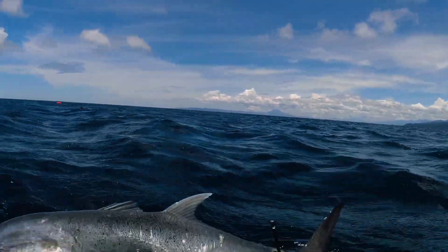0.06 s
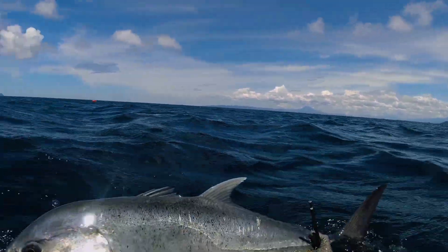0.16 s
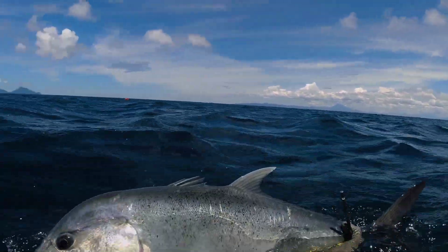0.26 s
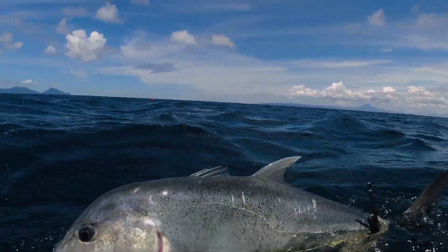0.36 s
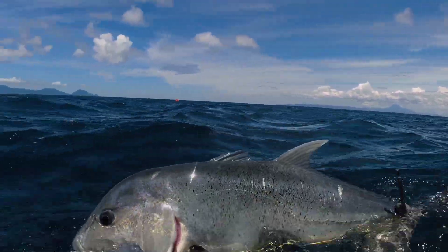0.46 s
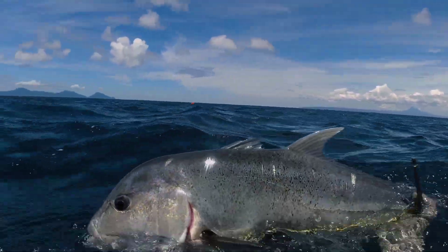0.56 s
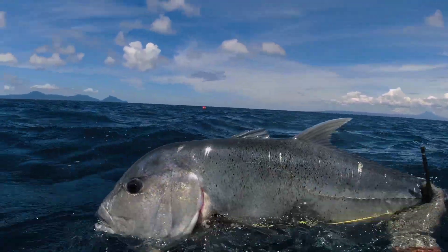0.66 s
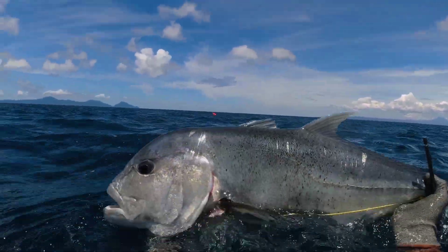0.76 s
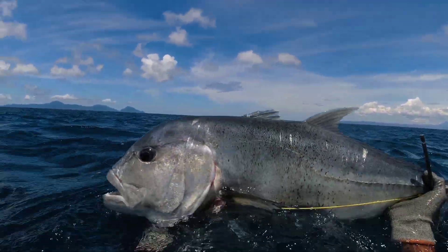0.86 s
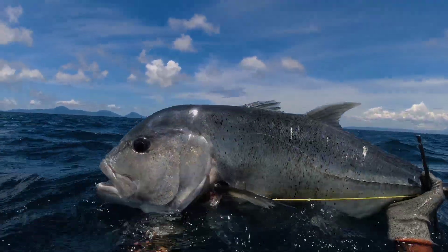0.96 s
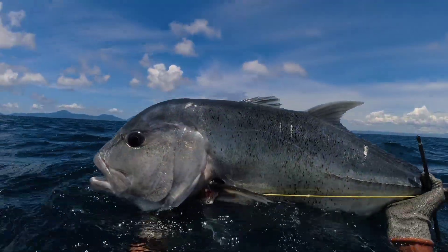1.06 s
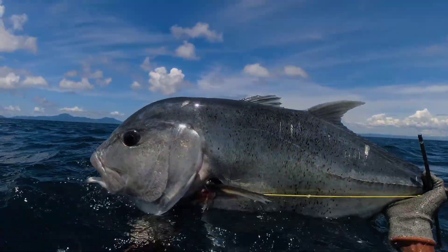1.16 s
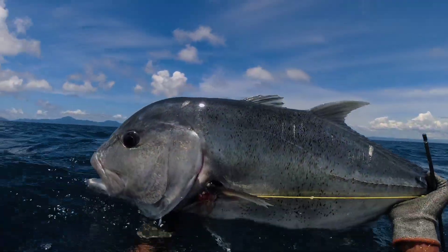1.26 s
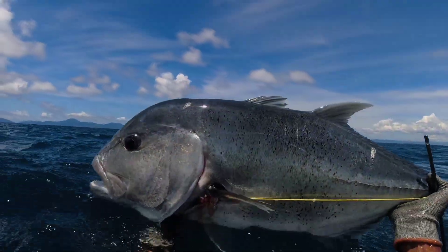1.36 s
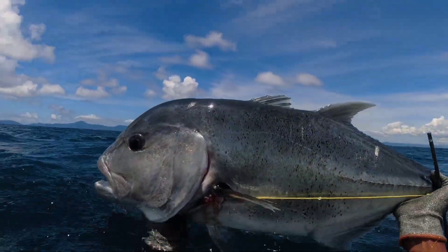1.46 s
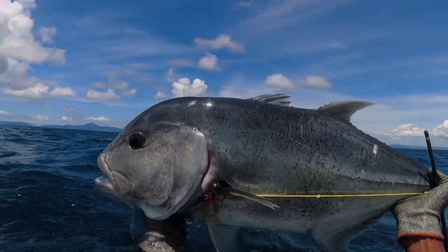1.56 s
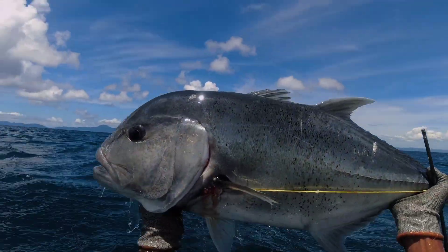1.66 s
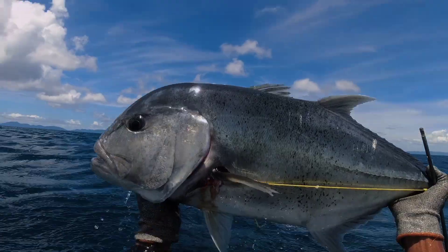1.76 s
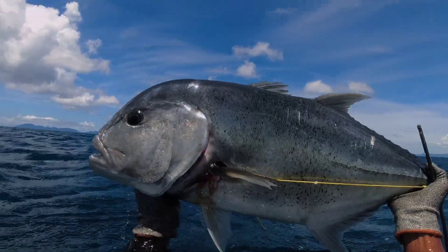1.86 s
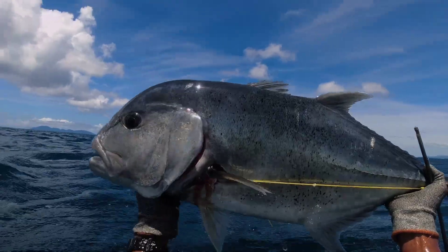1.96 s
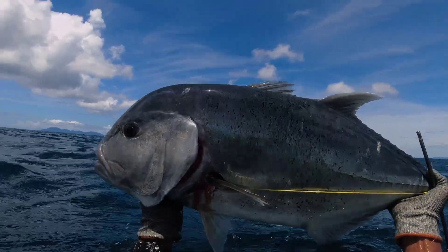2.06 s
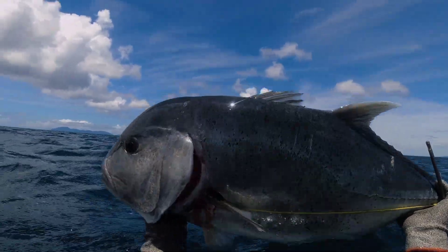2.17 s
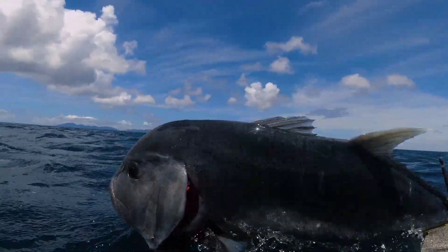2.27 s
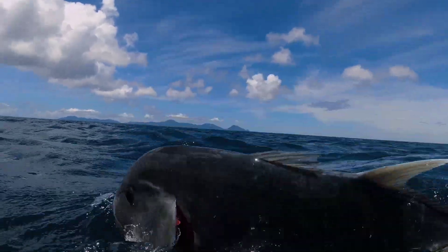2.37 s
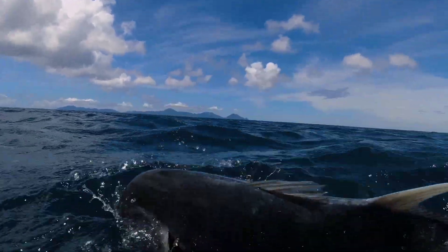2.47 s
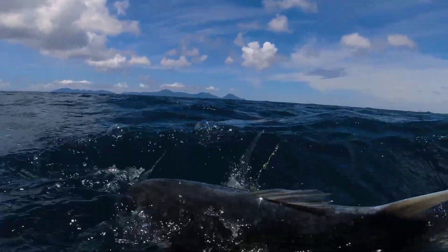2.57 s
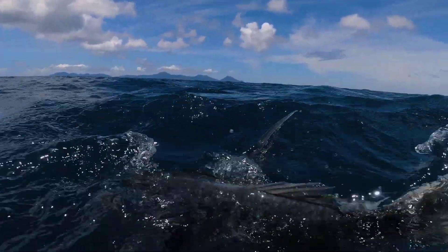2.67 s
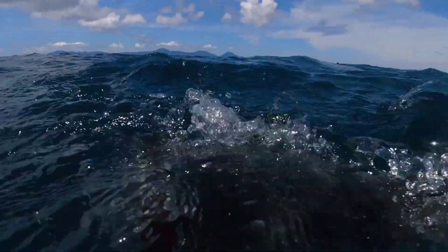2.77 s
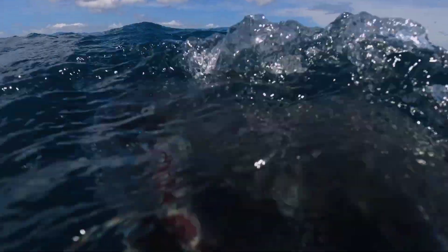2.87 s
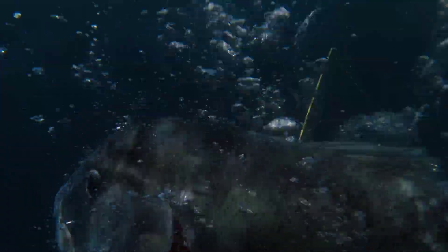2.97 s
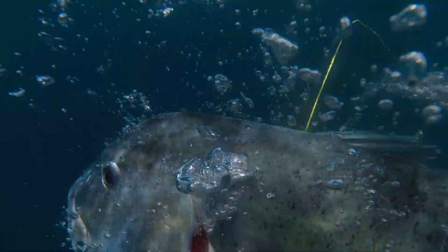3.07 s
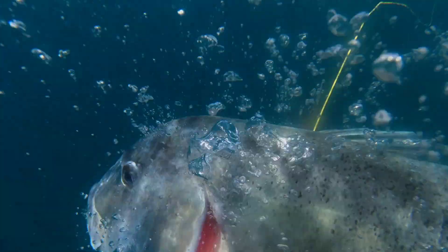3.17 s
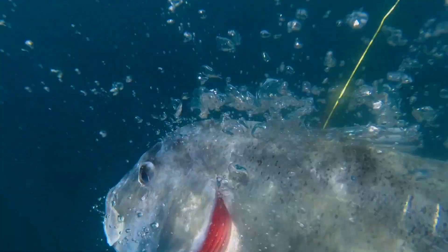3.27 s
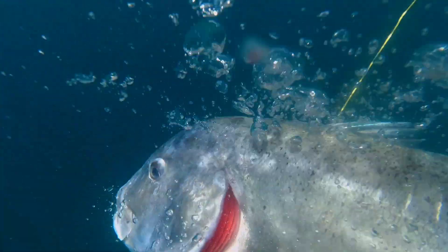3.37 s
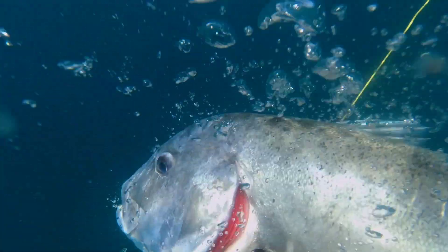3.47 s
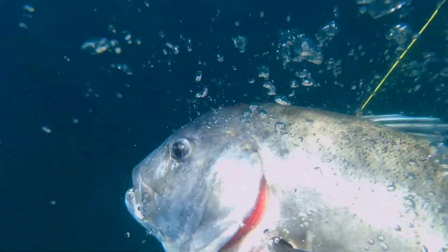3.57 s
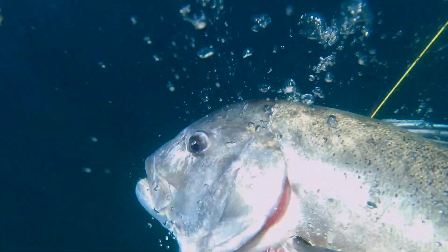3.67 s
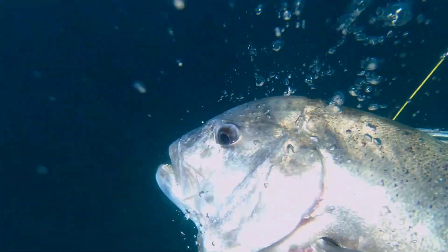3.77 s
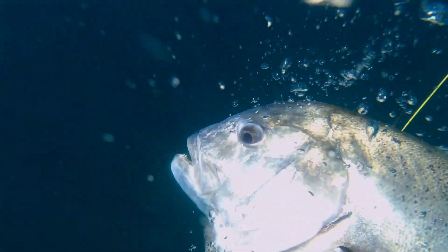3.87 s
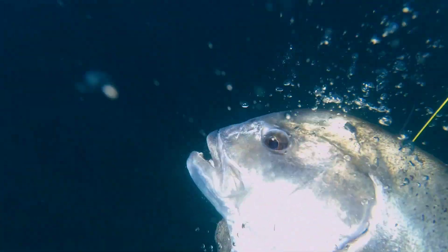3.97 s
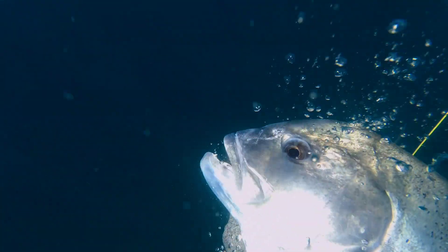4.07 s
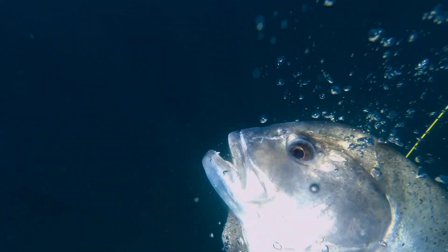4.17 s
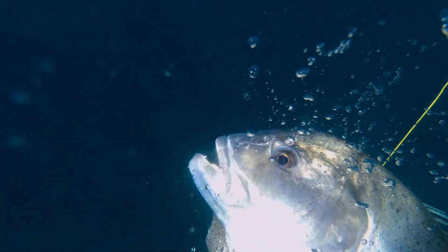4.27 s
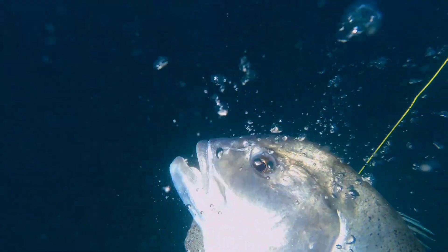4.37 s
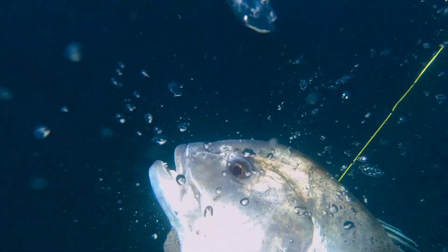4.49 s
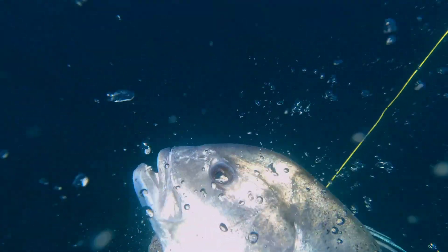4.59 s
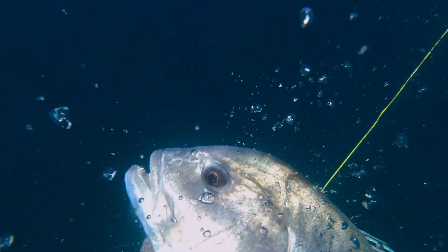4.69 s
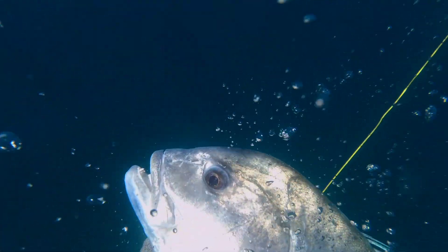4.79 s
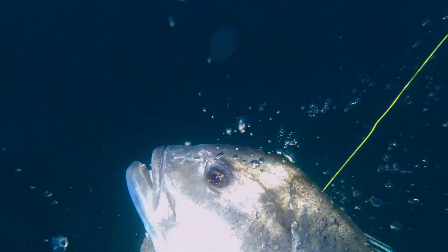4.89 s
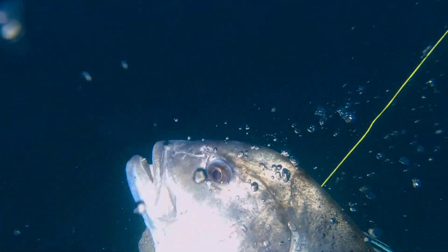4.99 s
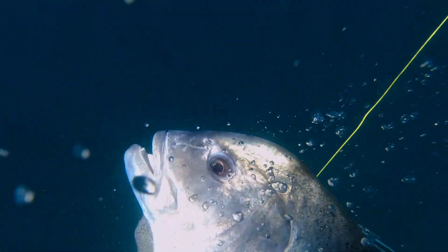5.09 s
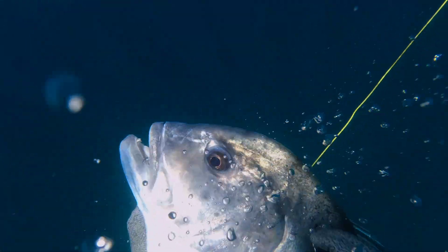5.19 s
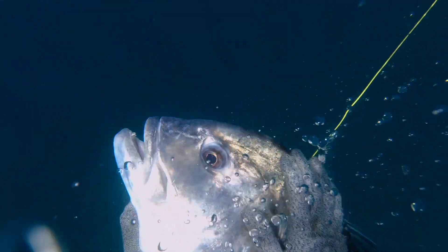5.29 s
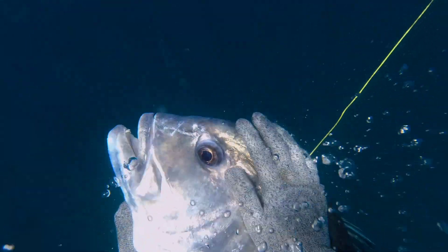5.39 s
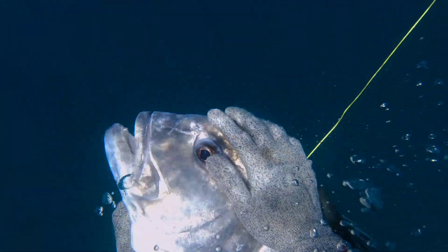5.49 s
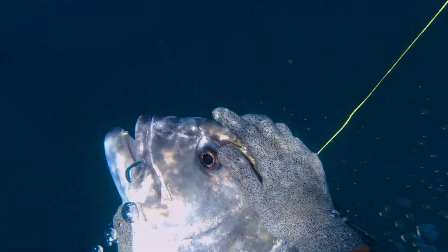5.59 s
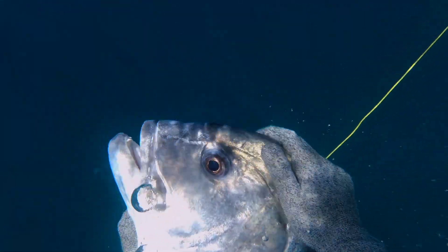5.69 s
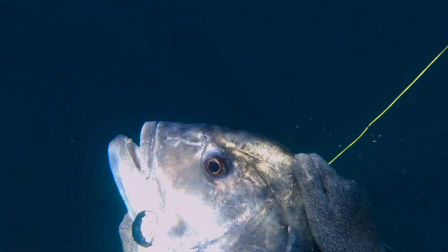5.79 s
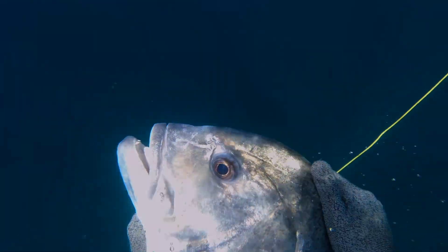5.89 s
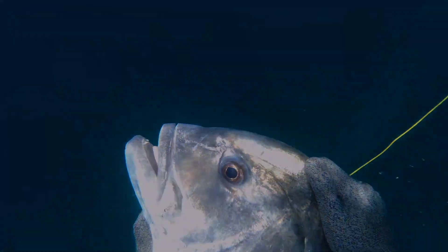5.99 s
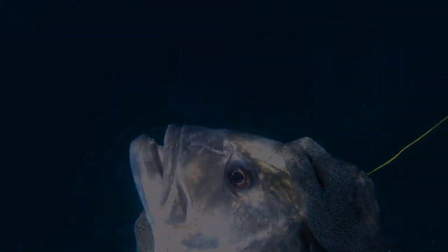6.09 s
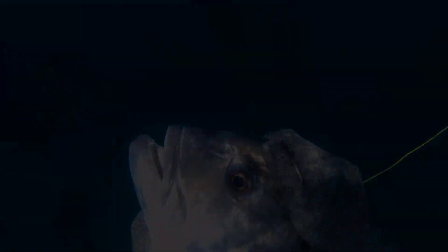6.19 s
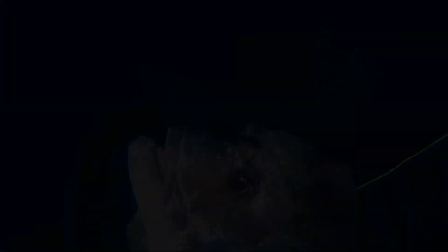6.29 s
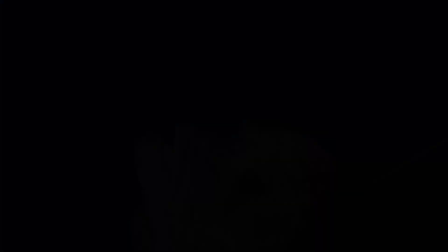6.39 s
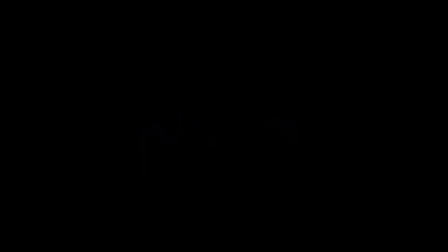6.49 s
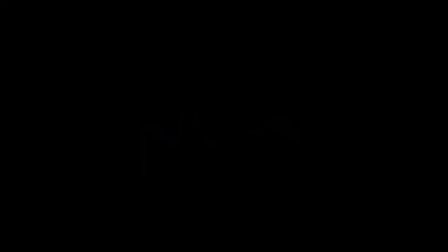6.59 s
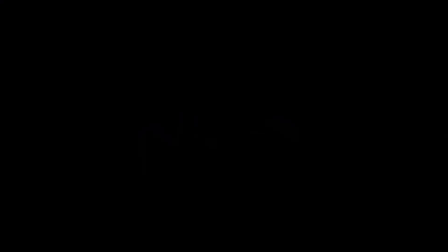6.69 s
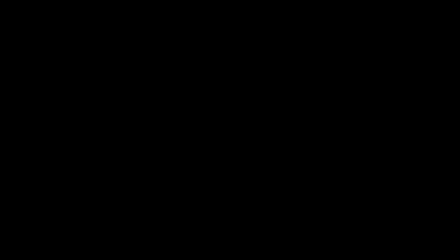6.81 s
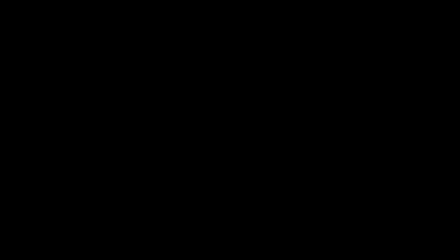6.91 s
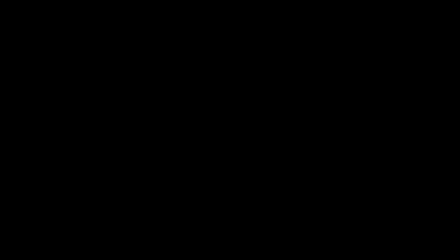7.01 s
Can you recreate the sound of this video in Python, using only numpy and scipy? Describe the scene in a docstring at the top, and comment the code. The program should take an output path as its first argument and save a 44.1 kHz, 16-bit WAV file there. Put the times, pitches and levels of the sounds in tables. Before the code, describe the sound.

Quiet wavelets and drips tick on a waterproof housing, then a loud crackling plunge overloads and gives way to muffled bubbling, gurgles and soft rubbing.

```python
"""Plunge under the sea

A camera in a waterproof housing lies among lapping wavelets and drips, then dips under water.
Drops, bubbles and wavelets are crowds of short ringing tones and noise, shaped by spectra.
The plunge is a dense crackle with popping bubbles; its loudest sounds overload the input.
Below, bubbles ring and gurgle through the housing's resonance, tiny ones tick, and a glove rubs on it.
"""
import sys
import numpy as np
from scipy.fft import rfft, irfft, next_fast_len
from scipy.io import wavfile
from scipy.ndimage import map_coordinates

SR = 44100
rng = np.random.default_rng(int(sys.argv[2]) if len(sys.argv) > 2 else 0)


def bounce(signal):
    """Save signal as a 16-bit WAV file at the path given by the first command-line argument."""
    frames = np.transpose(np.atleast_2d(signal))
    limited = np.clip(frames, -1, 1)
    pcm = np.round(limited * 32767).astype(np.int16)
    wavfile.write(sys.argv[1], SR, pcm)


N = 310902  # length in samples
END_S, TOP_HZ = 6.585, 15900  # the sound has faded out by END_S; nothing is heard above TOP_HZ

# In these tables, "decay" is the time to fall by 60 dB.
# How hard the wavelets lap, before each layer's own setting. Each row: time in seconds, level in dB.
LAPPING = [(0.0, -67), (0.4, -65.5), (0.56, -60.5), (0.75, -60), (0.95, -68.5), (2.25, -77.5),
           (2.34, -68.5), (2.49, -41.5), (2.545, -42), (2.61, -57), (2.72, -48.5), (2.76, -42.5),
           (2.88, -45), (2.97, -42)]
# Spectrum of the wavelets, peaking at the modes of the half-dry housing.
# Each row: frequency in Hz, relative level in dB per Hz.
SLOSH = [(200, -16.5), (420, -12.5), (590, -6), (740, -10.5), (920, 1.5), (1080, -9), (1450, -5.5),
         (1780, -22.5), (3000, -49)]
# Spectrum of their spray. Each row: frequency in Hz, relative level in dB per Hz.
SPRAY = [(900, -28.5), (1600, -11), (2200, 7), (3000, 1), (4000, -4.5), (5000, -10), (6500, -22.5),
         (7500, -28), (10500, -31.5), (15500, -48)]
# Slow water pressure on the ports, before heave_db. Each row: time in seconds, level in dB.
HEAVE_LEVEL = [(0.0, -58), (1.16, -56.5), (1.6, -59.5), (1.67, -29), (1.76, -60), (1.87, -52),
               (1.94, -24.5), (2.07, -21), (2.25, -56), (2.51, -51.5), (2.78, -28.5), (3.14, -32),
               (3.17, -22.5), (3.24, -54.5), (3.51, -37), (5.11, -56.5), (5.56, -40.5), (5.92, -61.5),
               (6.33, -40), (6.4, -40)]
# Spectrum of the slow pressure. Each row: frequency in Hz, relative level in dB per Hz.
HEAVE = [(3, -9.5), (8, 17.5), (13, 6.5), (20, 2), (35, -12), (60, -25), (130, -48.5), (600, -100)]
# Spectrum of the low hum. Each row: frequency in Hz, relative level in dB per Hz.
RUMBLE = [(20, -9.5), (55, 2.5), (90, 1), (125, -1.5), (160, -4.5), (220, -11), (290, -6.5), (420, -21.5),
          (900, -40.5), (3000, -72), (8000, -100)]
# The faint hiss, before its slow random drift. Each row: time in seconds, level in dB.
HISS = [(.5, -84), (2, -84.5), (4, -90.5), (4.6, -80.5), (5, -81), (6.1, -81)]
# Drops and slaps of water on the shell.
# Each row: start in seconds, peak level of the crack in dB, top frequency in Hz, decay in seconds.
SLAPS = [(.045, -42, 5700, 0.011), (0.053, -49, 3000, 0.017), (0.2135, -43.5, 4670, 0.018),
         (.222, -47, 3400, 0.047), (0.4708, -45, 5400, 0.023), (0.592, -52, 3500, 0.074),
         (1.038, -49.5, 3000, 0.03), (1.2197, -45, 1830, 0.018), (1.881, -52.5, 2600, 0.039),
         (2.0386, -46, 5100, 0.015), (2.161, -50.5, 4800, .035), (2.308, -40, 6640, 0.027),
         (2.567, -30, 3800, 0.057), (2.732, -31.5, 3900, 0.044), (2.7853, -27.5, 3900, 0.026),
         (2.9221, -29.5, 3403, 0.014), (2.9856, -10.5, 14000, 0.016), (2.998, -7.5, 16000, 0.056),
         (3.018, -19, 9000, 0.018), (3.063, -21, 7000, 0.073), (3.0821, -12, 14000, 0.0081),
         (3.0984, -11.5, 15000, 0.016), (3.112, -9.5, 14950, 0.013), (3.12, -15.5, 9000, 0.0075),
         (3.1622, -15.5, 15000, 0.0052), (3.171, -14, 15040, 0.02), (3.192, -17.5, 12000, 0.014),
         (3.218, -21.5, 3200, 0.018), (3.248, -30.5, 5000, 0.0016), (3.3567, -24, 3900, 0.0069),
         (3.6005, -25.5, 10130, 0.023), (3.716, -15.5, 9900, 0.012), (4.476, -54, 4800, 0.0121)]
# Spectrum of a slap's crack. Each row: frequency in Hz, relative level in dB per Hz.
CRACK = [(300, -20.5), (900, 10.5), (2100, -1), (3000, -0.5), (4000, -8.5), (5300, -11), (7500, -35),
         (11000, -19), (15500, -25.5)]
# Modes of the stiff shell under a sharp slap; their pitch differs at random from slap to slap.
# Each row: typical frequency in Hz, width in Hz, level in dB.
SHELL_MODES = [(1620, 220, -2.5), (2400, 650, 1), (2970, 400, 1), (3980, 200, -16), (4720, 840, -3.5),
               (5850, 1400, -23.5)]
# Modes of the housing under water. Each row: frequency in Hz, width in Hz, level in dB.
HOUSING_MODES = [(213, 160, -2.5), (480, 180, 3), (671, 43, 11), (1000, 60, -23), (1220, 36, -16.5),
                 (1560, 110, -21), (2160, 100, -25.5), (2460, 62, -23), (2970, 60, -28.5)]
# Single drips, bubbles and short ringing tones of the housing. Each row: start in seconds,
# typical peak level in dB, starting pitch in Hz, swell in seconds, decay in seconds.
BUBBLES = [(0.06, -38.5, 2044, 0.003, 0.025), (.221, -37.5, 1970, .002, 0.016),
           (0.348, -45, 1300, .002, 0.08), (0.379, -44, 960, 0.0013, .03), (0.477, -35, 1940, 0.002, 0.024),
           (0.536, -43.5, 1106, 0.0025, 0.045), (.589, -44.5, 2020, 0.0027, 0.017),
           (0.667, -41, 1460, 0.0026, 0.022), (.786, -55, 960, .003, 0.12),
           (.836, -38.5, 1416, 0.0015, 0.034), (1.222, -41.5, 976, 0.0008, 0.011),
           (1.646, -49.5, 1524, 0.0057, 0.074), (1.88, -39, 2000, .002, 0.0069),
           (1.947, -38, 2046, 0.004, 0.079), (2.432, -35, 1100, 0.0017, 0.017),
           (2.477, -28, 925, 0.019, 0.087), (2.58, -32, 700, 0.0015, 0.028),
           (2.701, -34.5, 2040, 0.0032, 0.031), (2.784, -17.5, 995, 0.0012, 0.0073),
           (2.824, -26.5, 876, 0.0026, 0.14), (2.861, -27, 828, 0.0025, 0.052),
           (2.862, -28, 599, 0.0022, 0.083), (2.9935, 6.5, 927, 0.0041, 0.0078),
           (2.9975, -5.5, 2155, 0.0016, 0.031), (3.0277, -8.5, 1156, 0.00095, 0.018),
           (3.043, -22, 1120, .003, 0.038), (3.082, -9.5, 1990, 0.0022, 0.023),
           (3.083, -9, 931.5, .002, 0.021), (3.0906, -5, 970, 0.0018, 0.0076),
           (3.12, -4, 690, 0.0015, 0.016), (3.129, -3.5, 494, 0.0098, 0.087),
           (3.153, -15, 2136, 0.004, 0.018), (3.161, 0, 708, .002, 0.007),
           (3.166, -8, 246.7, 0.0058, 0.083), (3.168, 6.5, 411.5, 0.011, .115),
           (3.213, -9.5, 706, 0.0019, 0.028), (3.217, -15, 1830, 0.0018, 0.016),
           (3.232, -8, 589, 0.0016, 0.015), (3.232, -11, 1253, 0.002, 0.033),
           (3.242, -14, 464, 0.0037, 0.14), (3.295, -16, 600, .004, 0.027), (3.31, -26.5, 504, .025, 0.34),
           (3.393, -13, 589, 0.0018, 0.045), (3.411, -33, 2396, 0.0026, 0.041),
           (3.41, -30.5, 617.6, 0.02, 0.33), (3.616, -14, 1475, 0.0006, 0.014),
           (3.658, -27, 2030, 0.0026, 0.037), (3.64, -33.5, 694, 0.0044, 0.26),
           (3.679, -32, 1070, 0.0014, 0.022), (3.7311, -23, 1155, 0.00083, 0.05),
           (3.737, -29, 1780, 0.0017, 0.097), (3.78, -33.5, 688, 0.028, 0.23),
           (3.831, -22.5, 674, 0.0067, 0.19), (3.832, -36.5, 933, 0.0035, 0.1),
           (3.8755, -18.5, 667, 0.003, 0.047), (3.893, -28.5, 398, 0.003, 0.063),
           (3.96, -25.5, 667, 0.0026, 0.066), (3.98, -29, 673, 0.014, 0.17),
           (4.051, -22, 502, 0.0023, 0.12), (4.108, -30, 621, 0.0046, 0.15),
           (4.16, -27.5, 437, 0.0043, 0.062), (4.2, -36, 471, 0.031, 0.097),
           (4.388, -35.5, 2430, 0.0016, 0.019), (4.405, -34.5, 452, 0.0091, 0.17),
           (4.473, -42, 1730, 0.0028, 0.078), (4.585, -34, 622, 0.0059, 0.095),
           (4.619, -19.5, 451.4, 0.02, 0.14), (4.633, -38.5, 1280, 0.0028, 0.11),
           (4.677, -29.5, 700, 0.0024, 0.044), (4.679, -23, 354, 0.0041, 0.041),
           (4.685, -40.5, 1630, 0.0032, 0.074), (4.692, -31.5, 836, 0.0036, 0.094),
           (4.711, -29, 442, 0.0036, 0.059), (4.741, -21, 549, 0.0067, 0.13),
           (4.753, -17, 661, 0.0078, 0.16), (4.8245, -22.5, 643, .002, 0.058),
           (4.824, -36.5, 980, 0.0028, 0.071), (4.858, -18.5, 625, 0.0023, 0.032),
           (4.875, -32.5, 541, 0.0039, 0.15), (4.966, -61.5, 1530, 0.0035, 0.055),
           (5.008, -37, 520, 0.0054, 0.086), (5.04, -38.5, 562, 0.0089, 0.1),
           (5.186, -35.5, 412.5, 0.009, 0.37), (5.192, -39.5, 544, 0.0041, 0.26),
           (5.27, -60, 2110, .003, 0.071), (5.326, -41, 546, 0.0082, 0.3), (5.327, -55.5, 1805, .003, .06),
           (5.383, -44, 476, 0.0099, 0.3), (5.437, -26, 588, 0.0043, 0.16),
           (5.438, -44.5, 985, 0.0019, 0.12), (5.53, -52.5, 1654, 0.0044, 0.049),
           (5.61, -40, 644, 0.0033, 0.058), (5.68, -46.5, 350, 0.008, 0.14), (6.141, -44, 701, 0.01, 0.11)]
# Low thumps and shoves, each a dying low tone.
# Each row: start in seconds, starting level in dB, frequency in Hz, decay in seconds.
THUMPS = [(.226, -41, 96, 0.27), (1.62, -20, 8.5, 0.23), (1.629, -36, 40, 0.52), (2.738, -17.5, 104, 0.12),
          (2.787, -24.5, 48, 0.27), (6.142, -37, 115, 0.13), (6.342, -31, 82, 0.12)]
# Patches of foam and trickles on the housing.
# Each row: middle in seconds, strongest level in dB, length in seconds, top frequency in Hz.
FOAM = [(0.355, -65, 0.071, 5300), (0.84, -68.5, 0.035, 5170), (2.116, -68, 0.085, 5050),
        (2.356, -61, 0.067, 6850), (2.591, -47.5, 0.032, 6600), (2.834, -59.5, 0.31, 5860),
        (3.379, -47, 0.017, 7600), (3.438, -40.5, 0.016, 6350), (3.619, -48.5, 0.022, 6170),
        (3.73, -47, 0.024, 6830), (4.38, -54, 0.034, 2813), (4.714, -53.5, 0.008, 3800)]
# Spectrum of the foam. Each row: frequency in Hz, relative level in dB per Hz.
FROTH = [(600, -22.5), (1200, -5.5), (2500, -2), (5800, -5.5), (6800, -14.5), (10000, 8.5), (12000, -34.5)]
# Dull knocks of waves and hands on the housing. Each row: start in seconds, peak of the ring in dB,
# peak of the thud in dB, decay of the push in seconds.
KNOCKS = [(1.04, -57, -44, .1), (2.526, -40, -29.5, 0.07), (2.733, -18, -24, 0.036),
          (2.747, -34, -28, 0.063), (2.785, -34, -30.5, 0.024), (3.017, -32.5, -19.5, 0.015),
          (3.162, -8.5, -10, 0.012), (3.716, -20.5, -27, 0.0064), (3.7333, -12.5, -36.5, 0.019),
          (4.3844, -34.5, -35.5, 0.011), (4.477, -50, -32, .03), (6.273, -28, -38, 0.027),
          (6.296, -34, -26, .06)]
# Spectrum of a knock's thud. Each row: frequency in Hz, relative level in dB per Hz.
THUD = [(25, -5.5), (80, 3), (150, -3), (300, -26), (600, -21.5), (2000, -55.5), (6000, -100)]
# Water slamming shut over the camera.
# Each row: time of full force in seconds, level in dB, hold in seconds.
SLAMS = [(2.98, -28.5, 0.07), (3.082, -18.5, 0.04), (3.163, -16, 0.018)]
# Spectrum of the plunge's crackle. Each row: frequency in Hz, relative level in dB per Hz.
ROAR = [(150, -13), (400, -9.5), (900, 5), (1400, 0), (2100, -0.5), (3000, -5.5), (4000, -13),
        (5200, -15.5), (7000, -28.5), (9000, -28.5), (13000, -25), (15500, -27)]
# How much air rises past the camera, before each layer's own setting.
# Each row: time in seconds, level in dB.
AIR = [(3.199, -16.5), (3.28, -30), (3.419, -29), (3.47, -44), (3.701, -40.5), (3.9, -34), (4.001, -39.5),
       (4.18, -52), (4.399, -42), (4.55, -42.5), (4.699, -37.5), (4.87, -42.5), (4.98, -52), (5.149, -54.5),
       (5.4, -54), (5.59, -55.5), (5.72, -61), (5.97, -73.5), (6.2, -60)]
# Spectrum of large bubbles. Each row: frequency in Hz, relative level in dB per Hz.
GURGLE = [(120, -28), (280, -16), (450, -9), (580, 0), (690, -3.5), (820, -5), (1050, -4), (1600, -70),
          (5000, -100)]
# Spectrum of small bubbles. Each row: frequency in Hz, relative level in dB per Hz.
FIZZ = [(700, -9), (1000, 7), (1270, -1.5), (1420, -5), (1620, 1.5), (1900, -11), (2150, -2.5), (2450, -7),
        (3000, -9), (3500, -17), (5000, -40), (7000, -50), (10000, -67.5)]
# Tiny bubbles ticking on the housing. Each row: start in seconds, peak level in dB.
TICKS = [(3.63, -25.5), (3.679, -43), (3.744, -36), (3.762, -36), (3.836, -39.5), (3.877, -37),
         (4.389, -36.5), (4.581, -51.5), (4.684, -55), (5.186, -60), (5.364, -54.5), (5.543, -62.5),
         (5.611, -59.5), (5.68, -57), (5.864, -63.5)]
# Spectrum of a tick. Each row: frequency in Hz, relative level in dB per Hz.
TICK = [(700, -19.5), (1250, -3), (1620, 0), (1900, -9.5), (2150, -3), (2500, -8.5), (3000, -11),
        (3600, -35.5), (6000, -60)]
# Rubbing on the housing: a stream of bubbles sweeping past it at 3.89 s, later the glove sliding on it. # Each
# row: time of full strength in seconds, level of the slips in dB, # level of the jolts in dB, rise in seconds,
# hold in seconds, decay in seconds.
RUBS = [(3.889, -35, -38.5, 0.03, 0.18, 0.28), (4.673, -38.5, -46.5, 0.023, 0.022, 0.16),
        (6.253, -42, -39, 0.01, 0.21, 0.56)]
# Spectrum of the rubbing's own scrape. Each row: frequency in Hz, relative level in dB per Hz.
SCRAPE = [(200, -5), (500, 7), (900, -3.5), (1300, 3), (1900, -25), (2900, -5), (3250, -17.5),
          (3600, -35.5), (5000, -65)]
# Spectrum of the rubbing's jolts. Each row: frequency in Hz, relative level in dB per Hz.
JOLT = [(40, -13), (100, -6.5), (170, 8), (240, -15.5), (380, 0.5), (600, -21.5), (1500, -62.5),
        (5000, -100)]
# The two ports hear the bass alike and the treble opposed.
# Each row: frequency in Hz, level of the side against the middle in dB.
WIDTH = [(100, -33), (400, -30.5), (700, -15), (1000, -10), (1300, 1.5), (1600, -0.5), (1950, 5),
         (2350, -7.5), (3500, 8), (5500, -2.5), (12000, 0.5)]

# A "GROWS" setting is the rise in dB for each dB of lapping or air.
SLOSH_DB, SPRAY_DB, SPRAY_GROWS = 4.5, -16, 0.9
SLOSH_LUMPS_DB, FLURRY_DB, CLUSTER_DB = 2.4, 2.8, 2.4  # depth of the random swells in the crowds
PLINK_DB, PLINK_GROWS = -14, 0.9  # single droplets at the surface
CLINK_DB = -31  # single small bubbles in the rising air
GURGLE_DB, FIZZ_DB, CHURN_DB, FIZZ_GROWS = -3, -25, -6.5, 0.97  # all follow the air
HUM_DB = -65.5  # low hum of the housing in still water
WASH_DB, WASH_GROWS = -42.5, 0.21  # what the wavelets add to the hum
SINK_S, SUNK_S = 2.3, 2.9  # the housing goes from dry to fully wet between these times
RING_DRY_DB, RING_WET_DB = -34, -6.5  # the housing's ring under a slap
SHELL_DB, SHELL_SHIFT = -4, 0.07  # the shell's ring; its modes are shifted at random from slap to slap
DRIP_HOLD_S = 0.0028  # a bubble at the surface rings this long, then bursts
SLAM_RISE_S, SLAM_T60 = 0.007, 0.11  # seconds
CLOUD_DB, CLOUD_T60 = -33.5, 0.93  # fizz left by the plunge, decay in seconds
TICK_T60 = 0.045  # seconds
SCRAPE_DB = -26.5  # the scrape, against the housing's ring
JOLT_LAG_S, JOLT_HOLD_S, JOLT_T60 = 0.043, 0.075, 0.55  # the housing jolts shortly after each rub sets in
WET_TOP_HZ = 3150  # water damps the housing's ring above this


def amp(db):
    """Turn decibels into a plain gain."""
    return 10 ** (np.asarray(db) / 20)


def unit(x):
    """Scale so that the middle of a stereo pair has an average (rms) strength of 1."""
    return x / np.sqrt(np.mean(x.mean(0) ** 2) + 1e-20)


def decay(t, t60):
    """A dying strength that has fallen by 60 dB at time t60."""
    return np.exp(-np.log(1000) * t / t60)


def along(points, hz):
    """Read between (Hz, value) points on a log frequency axis."""
    f, v = np.transpose(points)
    return np.interp(np.log(hz + 1), np.log(f + 1), v)


def wobble(rate):
    """A smooth random curve through this many random points a second."""
    knots = rng.standard_normal(int(N * rate / SR) + 4)
    return map_coordinates(knots, [np.arange(N) * rate / SR])


def level(rows):
    """One gain per sample from (seconds, dB) points."""
    return amp(np.interp(np.arange(N) / SR, *np.transpose(rows)))


def within(start, end, edge=0.024):
    """One from start to end, with short ramps outside."""
    t = np.arange(N) / SR
    return np.clip(np.minimum(t - start, end - t) / edge + 1, 0, 1)


def burst(s, rise, hold, t60):
    """A strength that rises to one at time s, holds and dies away."""
    t = np.arange(N) / SR - s
    return np.exp(-(np.minimum(t, 0) / rise) ** 2) * decay(np.maximum(t - hold, 0), t60)


def lapping():
    """The strength of the wavelets, until the sea closes over the camera."""
    return level(LAPPING) * within(0, SLAMS[0][0])


def airflow():
    """The amount of air rising past the camera."""
    return level(AIR) * within(AIR[0][0], AIR[-1][0])


def slamming():
    """The force of the water closing over the camera."""
    return sum(amp(db) * burst(s, SLAM_RISE_S, hold, SLAM_T60) for s, db, hold in SLAMS)


def wet(s, dry_db, wet_db):
    """A gain that changes as the housing sinks."""
    return amp(np.interp(s, [SINK_S, SUNK_S], [dry_db, wet_db]))


def filtered(x, response):
    """Shape a sound by a response that depends on frequency."""
    n = x.shape[-1]
    m = 2 * next_fast_len(n // 2 + SR // 10)  # spare room lets the ringing die out
    return irfft(rfft(x, m) * response(np.fft.rfftfreq(m, 1 / SR)), m)[..., :n]


def colour(points):
    """The response with this spectrum that never sounds ahead of its cause (minimum phase)."""
    def response(hz):
        cepstrum = irfft(along(points, hz) * np.log(10) / 20)
        half = len(cepstrum) // 2
        cepstrum[1:half] *= 2
        cepstrum[half + 1:] = 0
        return np.exp(rfft(cepstrum))
    return response


def dulled(points, top_hz):
    """The same kind of response, cut off steeply above a top frequency."""
    hz = np.geomspace(100, 20000, 80)
    cut_db = 10 * np.log10(1 + np.minimum(hz / top_hz, 1.7) ** 26)
    return colour(np.column_stack([hz, along(points, hz) - cut_db]))


def resonances(modes, hz):
    """The response of a set of ringing modes, added with alternating sign."""
    total = 0
    for k, (centre, width, db) in enumerate(modes):
        damping = 1j * hz * width
        total = total + (-1) ** k * amp(db) * damping / (centre * centre - hz * hz + damping)
    return total


def housing(hz):
    """The housing's modes ring; water damps everything above them."""
    ratio = hz / 3200
    gentle_cut = (1 + 1.4j * ratio - ratio ** 2) ** 2
    steep_cut = 1 + (hz / WET_TOP_HZ) ** 20
    return resonances(HOUSING_MODES, hz) / gentle_cut / steep_cut


def ports(pair, response):
    """Two driving signals, coloured, become the left and right ports through their middle and side."""
    def middle_and_side(hz):
        return response(hz) * np.array([np.ones(len(hz)), amp(along(WIDTH, hz))])
    mid, side = filtered(pair, middle_and_side)
    return np.array([mid + side, mid - side])


def add(track, s, sound):
    """Mix a sound in at time s."""
    i = max(round(s * SR), 0)
    track[:, i:i + sound.shape[1]] += sound[:, :N - i]


def uneven(chance, spread_db):
    """Random sizes: many small, few large, with a limit on the largest."""
    return amp(spread_db * np.minimum(-np.log(1 - chance), np.pi))


def patter(rate, spread_db, bed_db):
    """Two driving signals of tiny impacts, rate a second, of uneven size on a bed of noise."""
    rows = rng.random((int(rate * N / SR), 4))
    size = uneven(rows[:, 1], spread_db)
    at = (rows[:, 0] * N).astype(int)
    pair = np.array([np.bincount(at, size * np.sign(rows[:, c] - 0.5), N) for c in (2, 3)])
    return pair / pair.std() + amp(bed_db) * rng.standard_normal((2, N))


def swarm(rate, low_hz, high_hz, cycles, spread_db, bed_db, size, climb=0.14):
    """Two driving signals of small bubbles, each dying away over some cycles and rising in pitch."""
    rows = rng.random((int(rate * N / SR), 4))
    hz = low_hz * (high_hz / low_hz) ** rows[:, 1:2]
    turns = hz * np.arange(size) / SR  # cycles so far; size is the length in samples
    age = turns / cycles
    tone = np.sin(2 * np.pi * turns * (1 + climb * age))
    rings = uneven(rows[:, 2:3], spread_db) * tone * decay(age, 1) * (1 - np.exp(-turns))
    at = ((rows[:, :1] * N).astype(int) + np.arange(size)).ravel()
    sides = (1, np.sign(rows[:, 3:] - 0.5))  # middle, then a random side
    pair = np.array([np.bincount(at, (rings * g).ravel(), N)[:N] for g in sides])
    return pair / pair.std() + amp(bed_db) * rng.standard_normal((2, N))


def blow(t60, response, contact_db=16.0):
    """A first contact and a dying rush of noise through a response, its middle peaking at 1."""
    t = np.arange(SR // 6) / SR
    drive = rng.standard_normal((2, len(t))) * decay(t, t60)
    drive[0, 0] += amp(contact_db)
    sound = ports(drive, response)
    return sound / np.abs(sound.mean(0)).max()


def surface():
    """Breaking wavelets: short-lived bubbles under flurries of droplets, both growing with the lapping."""
    flurry = wobble(31)
    bubbling = swarm(rate=450, low_hz=530, high_hz=1750, cycles=18, spread_db=3, bed_db=-5, size=1200)
    droplets = swarm(rate=290, low_hz=1390, high_hz=6540, cycles=26, spread_db=2, bed_db=8.0, size=700)
    slosh = unit(amp(SLOSH_LUMPS_DB * flurry) * ports(bubbling, colour(SLOSH)))
    spray = unit(amp(FLURRY_DB * flurry) * ports(droplets, colour(SPRAY)))
    return amp(SLOSH_DB) * lapping() * slosh + amp(SPRAY_DB) * lapping() ** SPRAY_GROWS * spray


def plinks():
    """Single small bubbles ring clear of the crowd: from droplets at the surface, from rising air below."""
    above = swarm(rate=110, low_hz=800, high_hz=1800, cycles=32, spread_db=2, bed_db=-40, size=2200)
    below = swarm(rate=40, low_hz=1200, high_hz=2300, cycles=85, spread_db=2.5, bed_db=-40, size=4000)
    plink = amp(PLINK_DB) * lapping() ** PLINK_GROWS * unit(ports(above, np.ones_like))
    clink = amp(CLINK_DB) * airflow() * unit(ports(below, np.ones_like))
    return plink + clink


def flow(heave_db=1, plunge_db=-11):
    """Water pressure heaves on the ports and hums in the housing; wavelets, plunge and air churn it."""
    slow = unit(ports(rng.standard_normal((2, N)), colour(HEAVE)))
    low = unit(amp(2.8 * wobble(30)) * ports(rng.standard_normal((2, N)), colour(RUMBLE)))
    wash = amp(WASH_DB) * lapping() ** WASH_GROWS
    churn = wash + amp(CHURN_DB) * airflow() + amp(plunge_db) * slamming()
    return amp(heave_db) * level(HEAVE_LEVEL) * slow + np.hypot(amp(HUM_DB), churn) * low


def faint_hiss():
    """A faint noise whose level drifts slowly."""
    return level(HISS) * amp(1.1 * wobble(4.2)) * rng.standard_normal((2, N))


def slaps(ring_t60=0.063):
    """Water cracks on the shell and rings it; the housing's low modes join in once it is wet."""
    out = np.zeros((2, N))
    shifts = np.exp(SHELL_SHIFT * rng.standard_normal(len(SLAPS)))
    for (s, db, top_hz, t60), shift in zip(SLAPS, shifts):
        def shell_response(hz):
            # softer contacts, with a lower top frequency, sound duller
            return resonances(SHELL_MODES, hz * shift) / (1 + (hz / top_hz) ** 16)
        crack = blow(t60, dulled(CRACK, top_hz), contact_db=6)
        shell = blow(t60, shell_response, contact_db=6)
        ring = wet(s, RING_DRY_DB, RING_WET_DB) * blow(ring_t60, housing)
        add(out, s, amp(db) * (crack + amp(SHELL_DB) * shell + ring))
    return out


def bubbles(climb=0.32, rough=0.35, flutter_db=2.0, pinch_db=-20, pinch_t60=0.03):
    """Drips, bubbles and short housing tones swell, ring unevenly, climb in pitch and die away."""
    out, t = np.zeros((2, N)), np.arange(SR // 4) / SR
    sides = rng.choice([-1, 1], len(BUBBLES))
    for (s, db, hz, rise, t60), side in zip(BUBBLES, sides):
        dry = np.interp(s, [SINK_S, SUNK_S], [1, 0])
        swell = np.sin(np.pi / 2 * np.minimum(t / rise, 1))
        fall = decay(np.maximum(t - rise - dry * DRIP_HOLD_S, 0), t60)
        lead = side * np.arctan(amp(along(WIDTH, hz)))  # it reaches one port first
        # a bubble's shape wobbles: random changes of phase and of level, one every four cycles
        shape, size = (np.interp(hz * t / 4, np.arange(256), v) for v in rng.standard_normal((2, 256)))
        angle = 2 * np.pi * hz * (t + climb * t * t) + rough * hz / 1000 * shape
        tone = np.sin(angle + np.array([[1], [-1]]) * lead)
        add(out, s, amp(db + flutter_db * size) * swell * fall * tone)
        # under water, a bubble pinching off also nudges the housing
        add(out, s, amp(db + pinch_db) * (1 - dry) * blow(pinch_t60, housing, contact_db=1.0))
    return out


def thumps():
    """Low thumps and shoves, each a dying low tone, alike at both ports."""
    out, t = np.zeros((2, N)), np.arange(SR // 2) / SR
    for s, db, hz, t60 in THUMPS:
        tone = np.sin(2 * np.pi * hz * t) * decay(t, t60)
        add(out, s, amp(db) * tone * np.ones((2, 1)))
    return out


def foam():
    """Patches of tiny bubbles swell and burst on the housing."""
    out, t = np.zeros((2, N)), np.arange(-SR // 8, SR // 8) / SR
    froth = swarm(rate=710, low_hz=1120, high_hz=7340, cycles=38, spread_db=5.0, bed_db=-3.5, size=800)
    pieces = np.array_split(froth, len(FOAM), axis=1)
    for (s, db, length, top_hz), drive in zip(FOAM, pieces):
        patch = ports(drive[:, :len(t)], dulled(FROTH, top_hz))
        add(out, s + t[0], amp(db) * np.exp(-(t / length) ** 2) * unit(patch))
    return out


def knocks(thud_t60=0.12):
    """A soft blow rings the housing's modes and shoves it as a whole."""
    out = np.zeros((2, N))
    for s, ring_db, thud_db, t60 in KNOCKS:
        ring = amp(ring_db) * blow(t60, housing, contact_db=10)
        thud = amp(thud_db) * blow(thud_t60, colour(THUD))
        add(out, s, ring + thud)
    return out


def plunge(pops_db=-3):
    """Water slams over the housing in a dense crackle of drops; larger trapped bubbles pop through it."""
    trapped = swarm(rate=480, low_hz=680.0, high_hz=6630, cycles=20, spread_db=0, bed_db=-6.5, size=800)
    drops = patter(rate=1400, spread_db=4.5, bed_db=-15)
    crackle = unit(ports(trapped + drops, colour(ROAR)))
    large = swarm(rate=200, low_hz=480, high_hz=1500, cycles=24, spread_db=1.5, bed_db=-40, size=2000)
    pops = unit(ports(large, np.ones_like))
    return slamming() * (crackle + amp(pops_db) * pops)


def rising_air(murmur_db=-3):
    """Clustered bubbles ring long and keep the housing murmuring; the plunge's cloud fizzes out."""
    air, cluster = airflow(), wobble(22)
    cloud = amp(CLOUD_DB) * burst(SLAMS[-1][0], SLAM_RISE_S, 0, CLOUD_T60)
    large = swarm(rate=130, low_hz=330, high_hz=820, cycles=80, spread_db=1.2, bed_db=-3, size=5600,
                  climb=0.07)
    small = swarm(rate=400, low_hz=1000, high_hz=3200, cycles=55, spread_db=2, bed_db=0, size=2000,
                  climb=0.05)
    gurgle = unit(amp(0.93 * cluster) * ports(large, colour(GURGLE)))
    fizz = unit(amp(CLUSTER_DB * cluster) * ports(small, colour(FIZZ)))
    murmur = unit(ports(rng.standard_normal((2, N)), lambda hz: housing(hz) ** 2))
    fizz_level = np.hypot(amp(FIZZ_DB) * air ** FIZZ_GROWS, cloud)
    return amp(GURGLE_DB) * air * (gurgle + amp(murmur_db) * murmur) + fizz_level * fizz


def ticks(contact_db=0):
    """Tiny bubbles burst softly on the housing."""
    out = np.zeros((2, N))
    for s, db in TICKS:
        add(out, s, amp(db) * blow(TICK_T60, dulled(TICK, 2700), contact_db))
    return out


def rubs():
    """Small slips ring the housing, scrape and jolt it: a stream of bubbles sweeping past, later a soft glove."""
    slips = unit(ports(patter(rate=470, spread_db=5, bed_db=2), housing))
    scrape = unit(ports(patter(rate=680, spread_db=16.0, bed_db=-4.5), colour(SCRAPE)))
    jolts = unit(ports(patter(rate=15, spread_db=8.5, bed_db=-4.5), colour(JOLT)))
    rubbing = slips + amp(SCRAPE_DB) * scrape
    out = np.zeros((2, N))
    for s, slip_db, jolt_db, rise, hold, t60 in RUBS:
        out += amp(slip_db) * burst(s, rise, hold, t60) * rubbing
        out += amp(jolt_db) * burst(s + JOLT_LAG_S, JOLT_LAG_S / 2, JOLT_HOLD_S, JOLT_T60) * jolts
    return out


def scene():
    """Everything that reaches the two ports, over a faint hiss."""
    from_the_start = surface() + plinks() + flow() + faint_hiss()
    single_events = slaps() + bubbles() + thumps() + foam() + knocks()
    return from_the_start + single_events + plunge() + rising_air() + ticks() + rubs()


def record(dry, ceiling=0.7, fade_s=0.21):
    """The input saturates smoothly on the loudest sounds; then a fade-out and a band limit."""
    clipped = dry / (1 + np.abs(dry / ceiling) ** 6) ** (1 / 6)
    fade = np.clip((END_S - np.arange(N) / SR) / fade_s, 0, 1)
    return filtered(clipped * fade, lambda hz: hz < TOP_HZ)


dry = scene()
out = record(dry)
bounce(out)
```